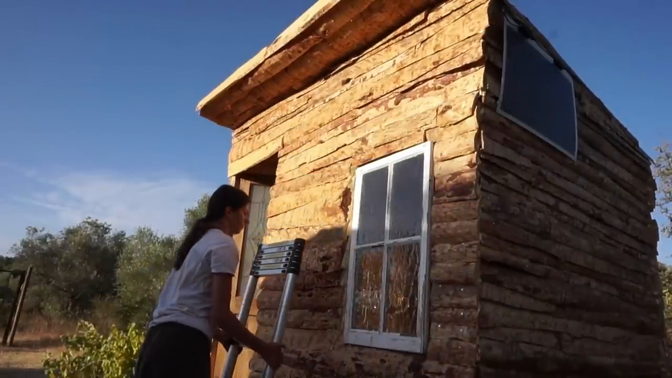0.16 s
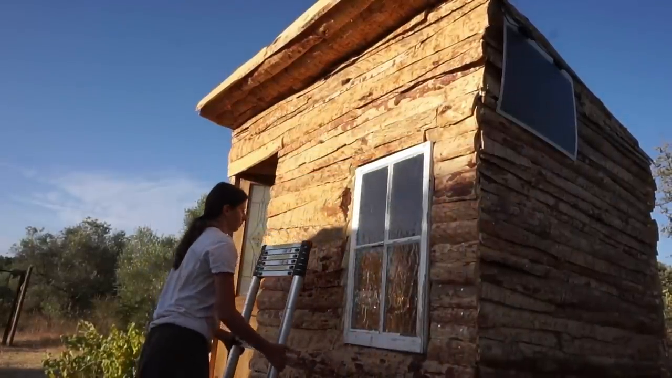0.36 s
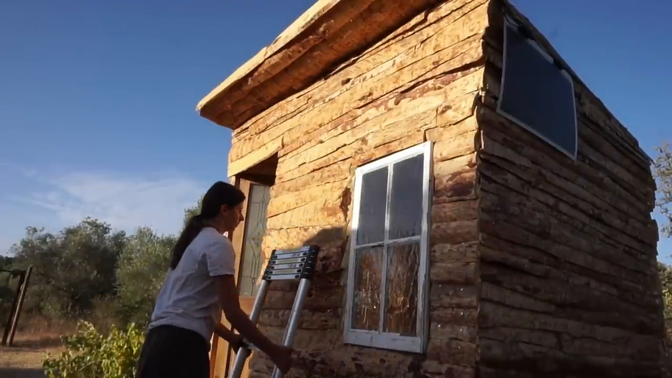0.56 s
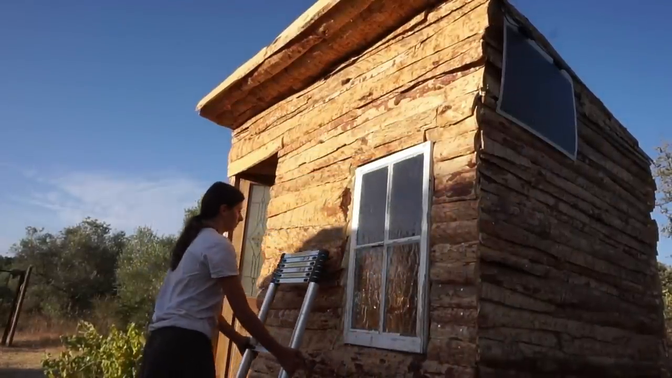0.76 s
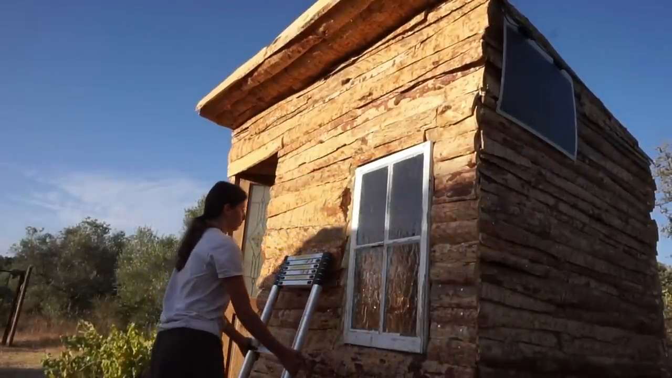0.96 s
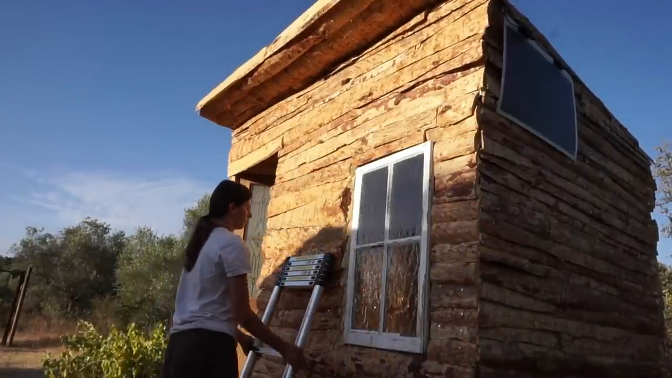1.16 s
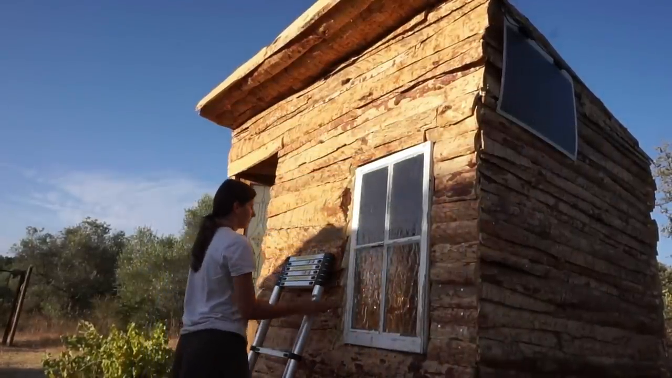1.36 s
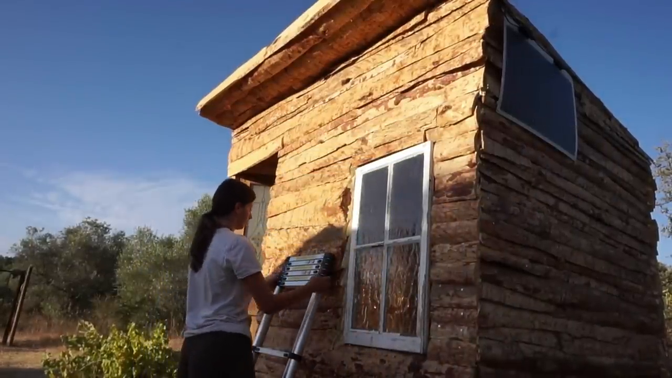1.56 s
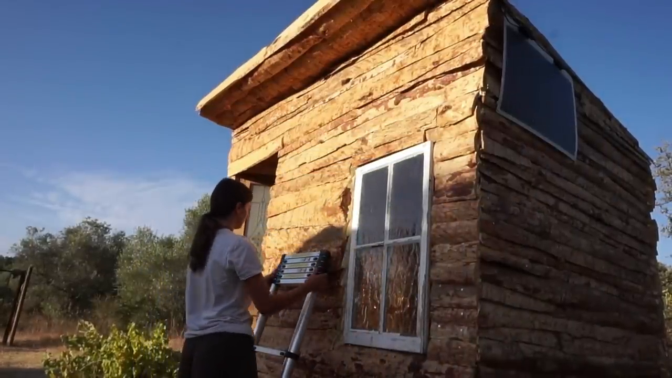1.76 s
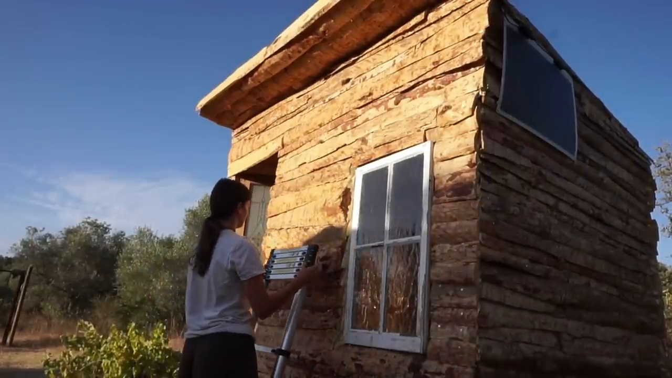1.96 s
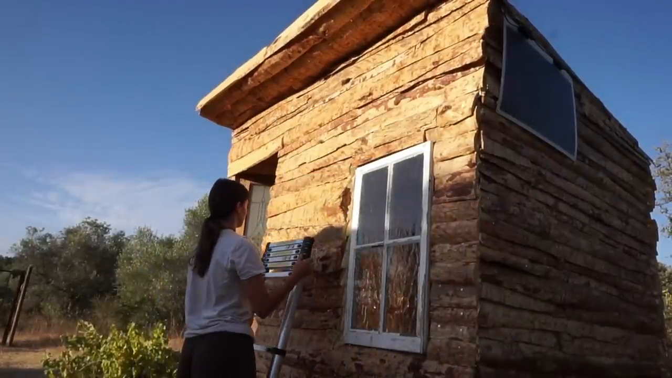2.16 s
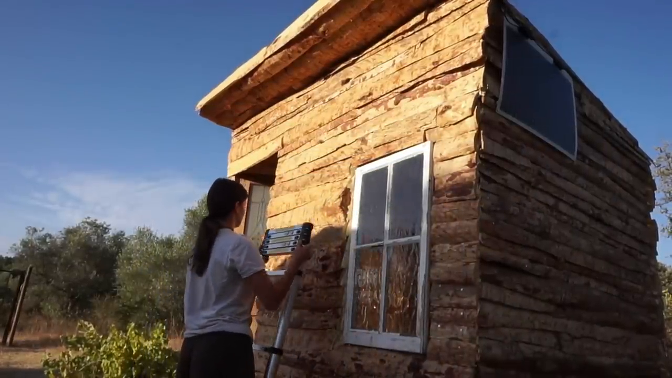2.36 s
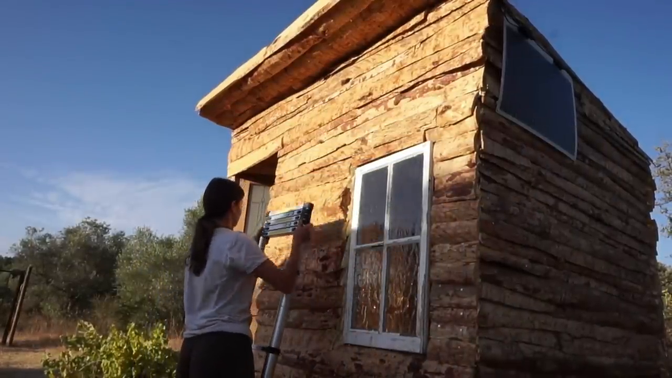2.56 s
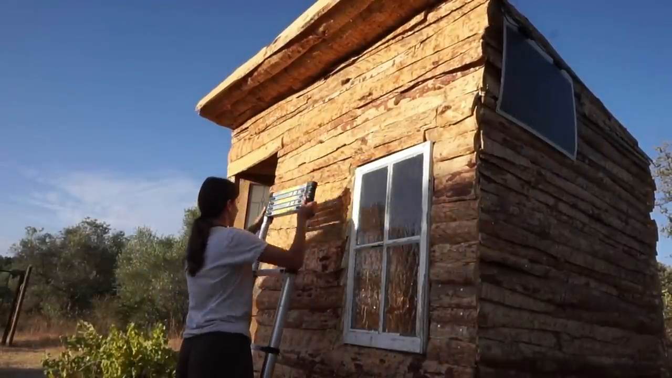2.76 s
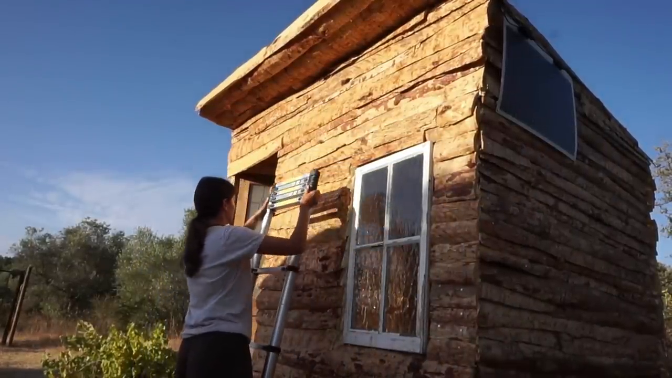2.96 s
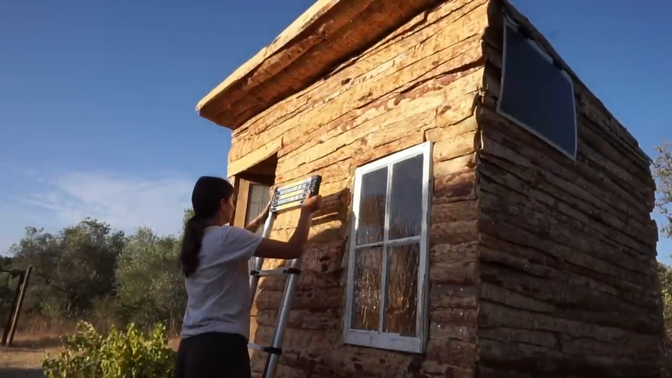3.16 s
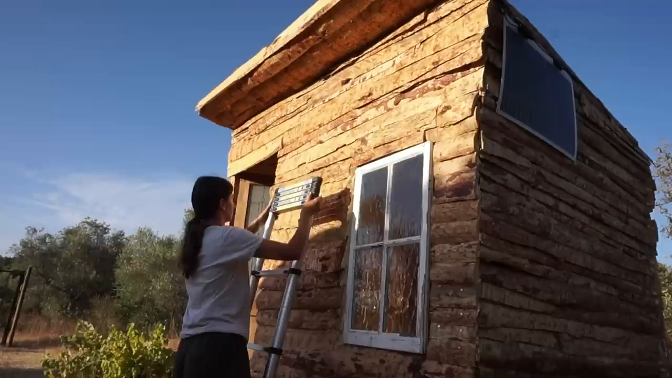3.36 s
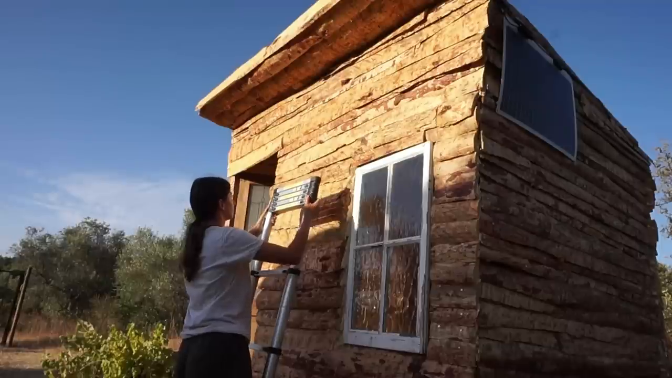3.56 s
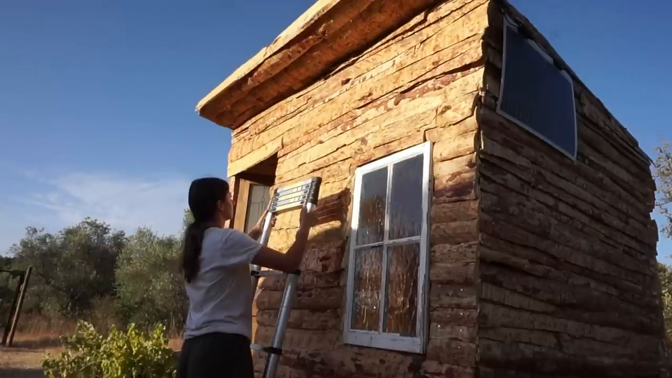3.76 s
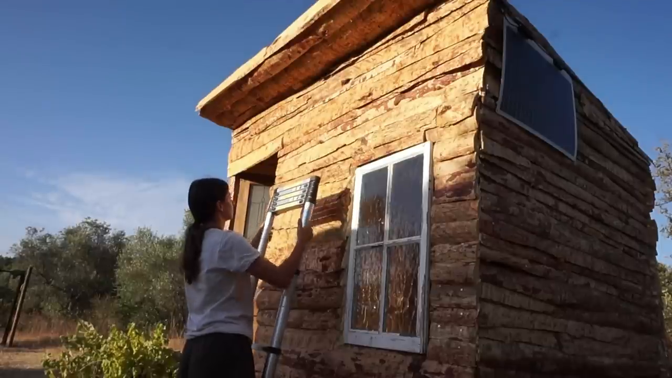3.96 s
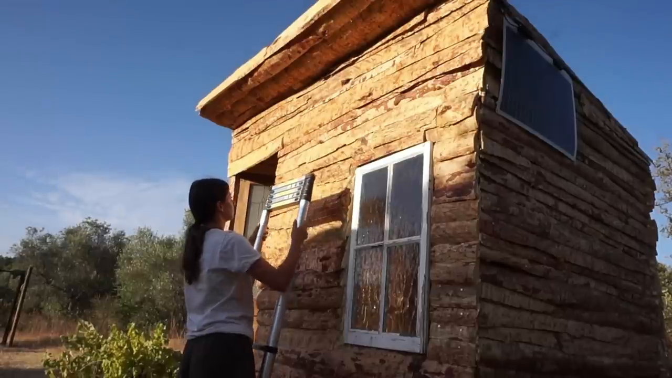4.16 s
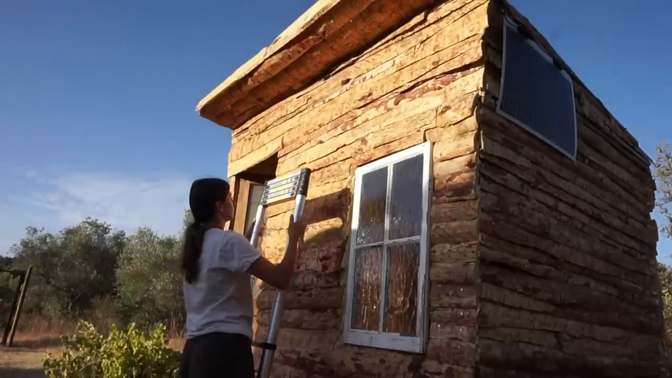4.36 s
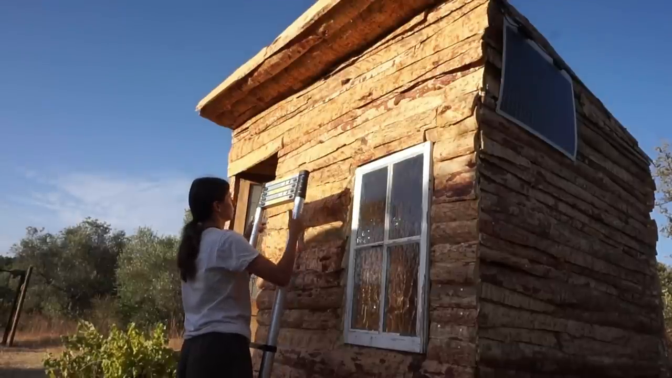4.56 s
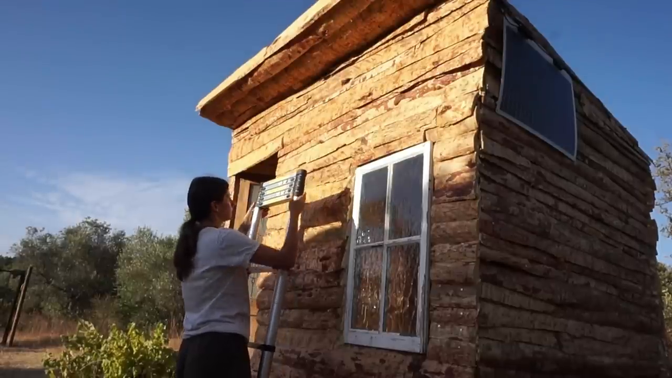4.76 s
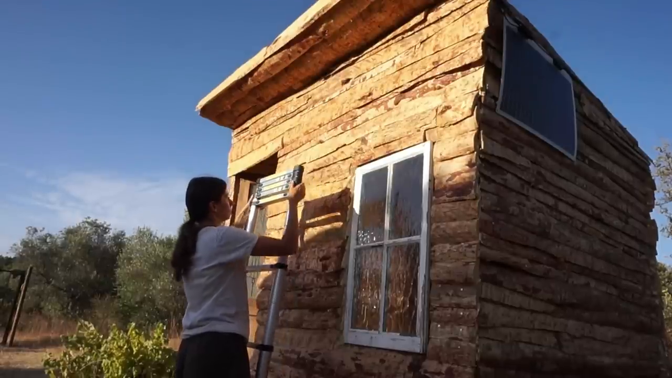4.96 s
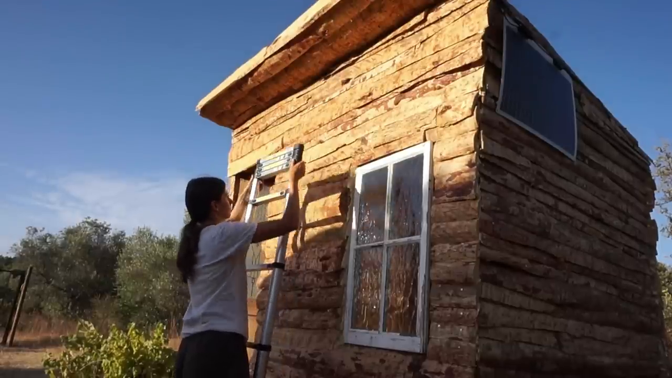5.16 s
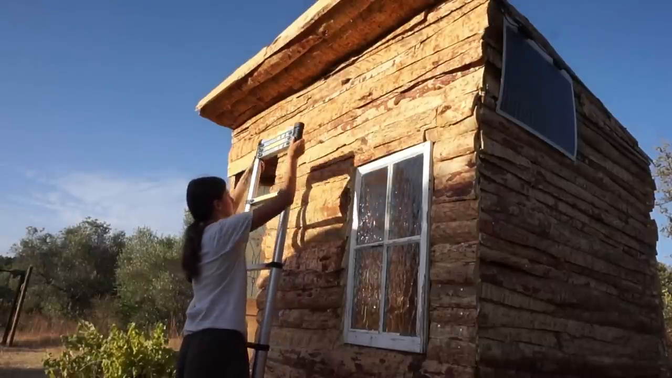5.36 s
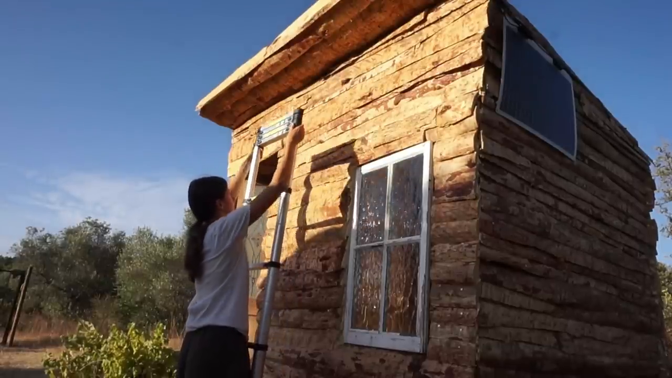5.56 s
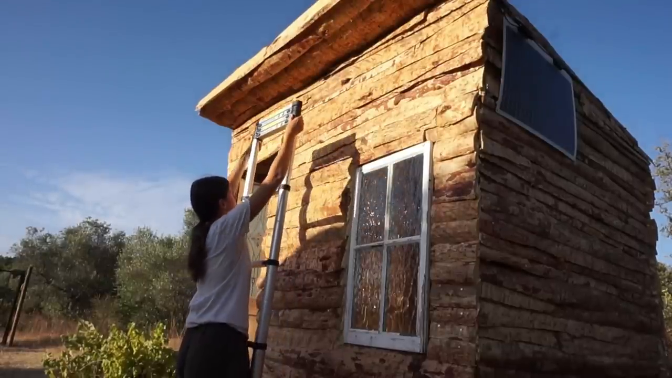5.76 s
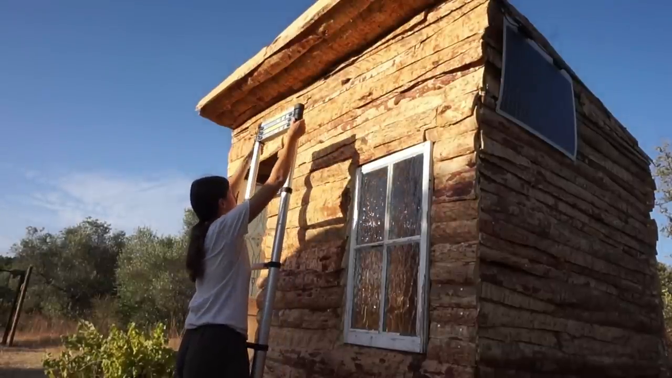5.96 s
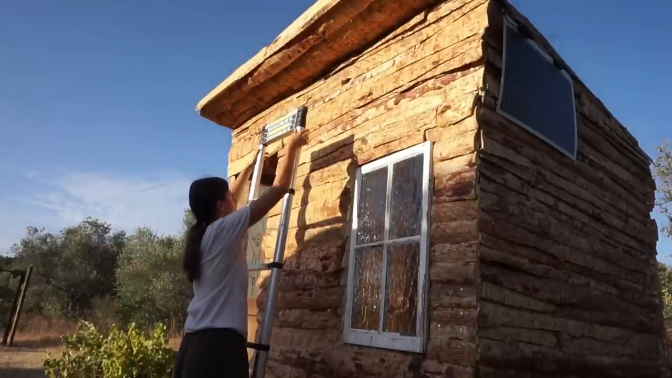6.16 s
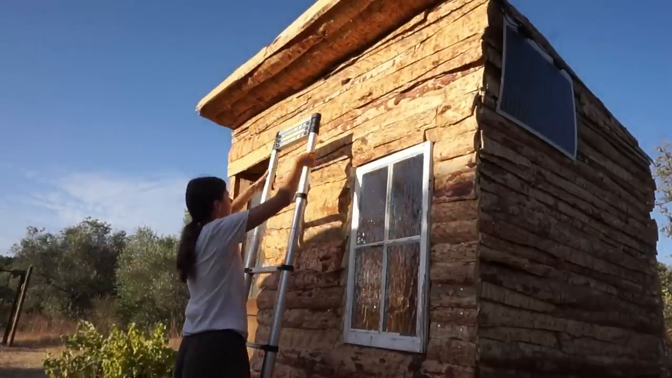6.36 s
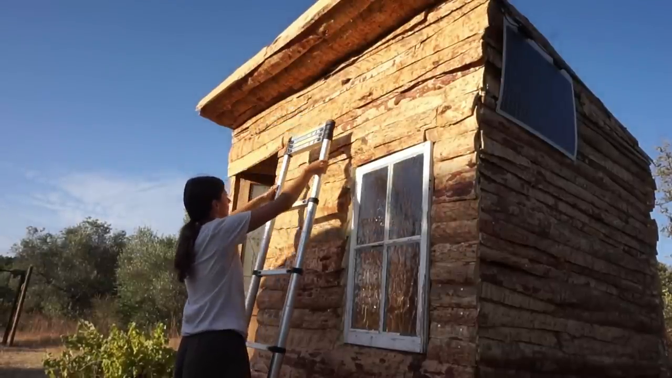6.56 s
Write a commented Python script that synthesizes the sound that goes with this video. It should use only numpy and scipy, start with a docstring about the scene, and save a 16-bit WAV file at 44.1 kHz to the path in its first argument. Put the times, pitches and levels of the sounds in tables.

```python
"""Aluminium ladder against a cabin wall

Outdoors in quiet country, one microphone, near enough that the surroundings answer only faintly.
A telescopic ladder is leaned on the wooden wall with a thump, then pulled up section by section.
Its tubes rub, catch and lock in bursts of short clacks, each leaving a faint hollow ring.
The trees keep up a low hush, and a light wind buffets the microphone."""
import sys
import numpy as np
from scipy import signal
from scipy.fft import rfft, irfft, next_fast_len
from scipy.io import wavfile
from scipy.ndimage import uniform_filter1d, map_coordinates

SR = 44100
rng = np.random.default_rng(int(sys.argv[2]) if len(sys.argv) > 2 else 0)


def unload_wav(signal):
    """Save mono or channel-first audio to the path in sys.argv[1] as 16-bit WAV at rate SR, clipped to [-1, 1]."""
    wavfile.write(
        sys.argv[1],
        SR,
        np.round(np.clip(np.atleast_2d(signal).T, -1, 1) * 32767).astype(np.int16),
    )


N = 291060

# hush of the trees: f/Hz, relative density/dB
HUSH_SPECTRUM = [(18, -48.5), (30, -18), (70, -21), (161, -3), (233, -1), (394, -4), (437, -3), (473, -4.5),
                 (1010, -11), (2900, -20), (3140, -20), (11700, -26.5), (16000, -26)]
# its course: t/s, level/dB
HUSH_COURSE = [(0, -59), (.6, -62), (1.5, -62), (2.2, -62.5), (4, -62.5), (6.6, -61.5)]
# wind on the microphone: f/Hz, relative density/dB
WIND_SPECTRUM = [(12, -39.5), (20, -5), (65, 2), (102, 1.5), (179, -9), (247, -22.5), (350, -28),
                 (460, -65), (770, -120)]
# the breeze, freshening halfway through: t/s, relative level/dB
BREEZE_COURSE = [(0, -65.5), (.9, -74), (2.8, -73), (3.6, -60), (5.0, -59.5), (5.9, -59), (6.6, -70)]
# puffs on top of it: middle t/s, half length/s, relative level/dB
WIND_PUFFS = [(.31, 0.024, -53.5), (1.16, 0.045, -58), (1.32, 0.047, -57.5), (3.47, .06, -48),
              (3.6, 0.028, -51.5), (4.1, 0.056, -43), (4.36, 0.045, -43), (4.48, 0.031, -45.5),
              (4.79, 0.03, -40.5), (5.23, 0.088, -43.5), (5.5, 0.014, -43), (5.61, 0.064, -37),
              (5.92, .03, -39.5), (6.3, .03, -53)]
# tubes, collars and pins striking:
# t/s, level/dB, low knock/dB, bright edge/dB, loss per rebound/dB, struck part's f/Hz
STRIKES = [(0.304, -53, -6, -3, 4, 2430), (0.361, -46.5, -14, -12, 15, 2440),
           (0.657, -55, -4, 8.5, 10, 4440), (0.674, -43, -0.5, -0.5, 6, 1256),
           (0.969, -53, -22, -1, 12, 1550), (1.001, -53.5, -18, -2, 12, 3400),
           (1.113, -54, -8, 6.5, 12, 14000), (1.125, -41, 22, 0, 8.5, 645), (1.16, -43.5, 5, 9.5, 7, 3900),
           (1.8, -62, -6, 10, 15, 6200), (2.586, -39, -7, -6, 10.5, 2440),
           (2.598, -36.5, 11, -2.5, 8, 1326), (2.633, -39.5, 6, -4.5, 6.5, 670),
           (2.65, -13.5, -1, -22, 20, 1770), (2.654, -19, 2, 0.5, 18, 658),
           (2.795, -50, -20, -13.5, 20, 1340), (2.824, -48, -20, -16, 20, 1370),
           (2.935, -34.5, 0.5, -6, 1, 1340), (2.951, -18.5, -13.5, 5, 5, 3260),
           (2.955, -17.5, -1.5, -1, 11, 1813), (2.992, -28, 0, -2, 9, 2420), (3.12, -40, 1, -9, 8, 2760),
           (3.15, -41, 0, 6, 8, 6240), (3.161, -31.5, 0.5, -12.5, 13, 1490), (3.179, -37.5, 0, 2, 20, 7000),
           (3.191, -36.5, 0, 6, 8, 3220), (3.204, -31, -2, -6, 12, 1286), (3.241, -48.5, 10.5, 3, 12, 710),
           (3.368, -40.5, 11.5, -1.5, 18, 842), (4.284, -41, 8.5, 3.5, 19, 1753),
           (4.309, -38.5, 7.5, 6, 9, 6930), (4.335, -34.5, 0, 7.5, 20, 3220),
           (4.345, -31.5, 3, -11, 14, 2450), (4.564, -41, 15, -4.5, 3, 660),
           (4.58, -32.5, 5, -1.5, 0.5, 887), (4.609, -27.5, 2, 0, 11, 2455),
           (4.625, -34, 11.5, 5.5, 12, 8730), (4.714, -50, 9, -12, 20, 1036),
           (4.992, -50, 5.5, -6, 18, 1630), (5.04, -52, 5, -3, 10.5, 2370),
           (5.173, -39.5, 9.5, 1.5, 5.5, 8660), (5.225, -52.5, 10, 9, 11, 6530),
           (5.299, -39.5, -1, 0, 6, 3420), (5.311, -27, 2.5, -4, 9, 1286), (5.339, -33.5, 5, -6, 12, 1845),
           (5.351, -15, -6, -7, 21, 691), (5.387, -40, 0.5, -3, 1, 4370), (5.743, -43, 5, -6, -4, 954),
           (5.767, -22, -19, 5.5, 20, 2820), (5.771, -24, 0.5, 7.5, 14, 4300),
           (5.781, -22.5, -13, 1, 19, 1770), (5.795, -25, -2.5, 0.5, 9.5, 3100),
           (5.825, -29.5, 3, -4, 9, 6000), (5.919, -34.5, 2, 1, 12, 6160), (5.928, -29, 4, -4, 14, 1490),
           (5.943, -30.5, 6, 6, 0, 2440), (5.981, -20, 0.5, 1, 17, 1620)]
# mean colour of a clack: f/Hz, relative density/dB
CLACK_SPECTRUM = [(100, -50.5), (170, -9.5), (563, -2.5), (631, -1.5), (1080, -2.5), (1760, -2), (2010, -6),
                  (2480, -3), (3000, -7.5), (4480, -9.5), (4920, -11.5), (10300, -17), (14000, -26.5),
                  (16000, -32)]
# damped resonances of the frame: f/Hz, width/Hz, boost/dB
FRAME_RESONANCES = [(654, 20, 2.5), (708.5, 21, 7.5), (820, 38, 5.5), (962, 43, 3.5), (1108, 11.7, 9.5),
                    (1300, 45, 5), (1467, 18, -2), (1764, 52, 5.5), (1866, 40, 3.5), (2310, 31, -2.5),
                    (2410, 25.4, -7), (2548, 46, 7), (2690, 34, 9), (2873, 24, 10), (3133, 80, -1),
                    (3205, 57, 7.5), (3540, 95, 2.5), (4460, 85, 8), (6500, 240, 4)]
# lingering modes of the tubes: f/Hz, relative level/dB, t60/s
TUBE_MODES = [(720, -25, .12), (1340, -31, .2), (1660, -30, .16), (1790, -23, .1), (2340, -28, .17),
              (2450, -28, .22), (2740, -28, .11), (3220, -28, .11)]
# the struck section, changing with its free length and the grip: t/s, lowest f/Hz, t60/s
STRUCK_SECTION = [(0, 200, 0.056), (2.58, 350, 0.096), (2.7, 350, 0.038), (2.93, 213, 0.072),
                  (4.6, 231, 0.076), (5.35, 258, 0.054), (5.8, 238, 0.08), (6, 215, 0.064)]
# a pin snaps home and rebounds as the ladder settles on the wall: t/s, f/Hz, level/dB, t60/s
PIN_SNAPS = [(1.1654, 4800, -17.5, 0.004), (1.169, 5580, -33.5, 0.0076)]
# scrapes as the ladder is shifted into place: middle t/s, half length/s, level/dB
SHIFT_SCRAPES = [(.35, 0.047, -62), (.68, 0.032, -57.5), (1.1, 0.055, -62.5)]
# friction of two tubes sliding out, one list a stroke: t/s, level/dB
SLIDE_STROKES = [
    [(2.3, -89), (2.5, -63.5), (2.62, -63), (2.8, -66), (2.92, -61.5), (3.1, -83)],
    [(4.5, -75), (4.75, -74.5), (5.1, -69), (5.3, -56.5), (5.55, -63), (5.7, -68.5), (5.9, -101)],
]
# hollow tube resonances, a list for the scrapes, then one a stroke: f/Hz, width/Hz, relative level/dB
BORE_RESONANCES = [
    [(1100, 500, -2), (2450, 900, 0), (4300, 1200, -6)],
    [(720, 80, -8), (1330, 80, 3), (1680, 120, -8), (2450, 130, -1), (2850, 200, -13), (6770, 500, -22)],
    [(720, 100, -4), (1150, 200, -7), (1640, 110, 2), (2400, 200, -8), (3400, 400, -14), (8600, 900, -23)],
]
# the ladder's top meets the wall: t/s, level/dB
WALL_BUMPS = [(1.1232, -29), (1.145, -37), (1.162, -34.5)]
# modes of the planks: f/Hz, relative level/dB, t60/s
PLANK_MODES = [(190, -22, 0.62), (210, -16.5, 0.29), (257, -5, 0.26), (343.6, -0.5, 0.12),
               (389, -5.5, 0.15), (500, -6, 0.036), (637, -10, 0.058), (778, -11, .05), (1065, -11, 0.046),
               (1465, -12, 0.046)]
# decay of the outdoor echo: f/Hz, t60/s
ECHO_DECAY = [(200, 1.3), (1500, 0.96), (5000, 1), (14000, 2.5)]
# its colour: f/Hz, gain/dB
ECHO_GAIN = [(200, 7), (1500, -7), (5000, -0.5), (12000, -1)]


def amp(db):
    return 10 ** (np.asarray(db) / 20)


def unit_rms(x):
    return x / np.sqrt(np.mean(x ** 2) + 1e-20)


def along(points, hz):
    """Read (f/Hz, value) points on a log frequency axis."""
    f, values = np.transpose(points)
    return np.interp(np.log(hz + 1), np.log(f + 1), values)


def curve(rows):
    """One value per sample from (t/s, value) rows."""
    return np.interp(np.arange(N) / SR, *np.transpose(rows))


def swells(rows):
    """A gain that rises and falls once for each (middle t/s, half length/s, level/dB) row."""
    t = np.arange(N) / SR
    return sum(amp(db) * np.exp(-((t - s) / half) ** 2) for s, half, db in rows)


def fade(t, t60):
    """Exponential decay, 60 dB down after t60."""
    return np.exp(-np.log(1000) * t / t60)


def wobble(rate):
    """A smooth random curve, rate knots a second."""
    return map_coordinates(rng.standard_normal(int(N * rate / SR) + 4), [np.arange(N) * rate / SR])


def filtered(x, response):
    """Shape x by a function of frequency."""
    size = next_fast_len(len(x) + 8192)
    return irfft(rfft(x, size) * response(np.fft.rfftfreq(size, 1 / SR)), size)[:len(x)]


def noise(spectrum):
    """Coloured noise of rms 1."""
    return unit_rms(filtered(rng.standard_normal(N), lambda hz: amp(along(spectrum, hz))))


def add(track, s, sound):
    """Mix a sound into the track at s seconds."""
    part = track[max(round(s * SR), 0):][:len(sound)]
    part += sound[:len(part)]


def ring(modes, t, scatter_db):
    """Damped modes, each struck at a random strength and sign."""
    hz, db, t60 = np.transpose(modes)[:, :, None]
    gain = amp(db + scatter_db * rng.standard_normal(hz.shape)) * rng.choice([-1, 1], hz.shape)
    return np.sum(gain * np.sin(2 * np.pi * hz * t) * fade(t, t60), axis=0)


def tree_hush(drift_db=1.3):
    """The trees around the cabin give a nearly steady hush."""
    return amp(curve(HUSH_COURSE) + drift_db * wobble(rate=6.7)) * noise(HUSH_SPECTRUM)


def wind_on_microphone(gain_db=-1, flutter_db=2.5):
    """Eddies of a fluttering breeze and its puffs rumble right on the microphone."""
    eddies = noise(WIND_SPECTRUM)
    power = np.abs(uniform_filter1d(eddies ** 2, size=4000))
    eddies /= np.sqrt(power + 1e-6)  # the gusts alone set their strength
    breeze = amp(curve(BREEZE_COURSE) + flutter_db * wobble(rate=14))
    return amp(gain_db) * np.hypot(breeze, swells(WIND_PUFFS)) * eddies


def rebounds(count=2, flight_s=.0125, scatter=.12):
    """Loose parts strike and fall back, mostly weaker: yields t/s, level/dB, knock/dB, edge/dB."""
    for s, db, knock_db, edge_db, loss_db, _ in STRIKES:
        flights = flight_s * np.exp(scatter * rng.standard_normal(count))
        for k, delay in enumerate(np.cumsum([0, *flights])):
            if k * loss_db < 20:
                yield s + delay, db - k * loss_db, knock_db, edge_db


def ladder_clacks(hold_s=0.0017, edge_t60=0.063, shiver_db=-23, shiver_t60=0.29, tubes_db=2):
    """Each blow shakes a crowd of frame modes that plastic collars soon damp; a few tube modes ring on."""
    t = np.arange(16384) / SR
    hz = np.fft.rfftfreq(len(t), 1 / SR)

    def crowd(gain):
        """Dense modes in random phase."""
        return irfft(gain * np.exp(2j * np.pi * rng.random(len(hz))))

    def ripple(size):
        """Noise smoothed over size points."""
        return unit_rms(signal.fftconvolve(rng.standard_normal(len(t)), np.hanning(size), "same"))

    frame = amp(sum(db / (1 + (2 * (hz - f) / width) ** 2) for f, width, db in FRAME_RESONANCES))
    body = frame * amp(along(CLACK_SPECTRUM, hz))
    body /= np.std(irfft(body))
    treble = 1 / (1 + (4000 / (hz + 1)) ** 4)
    upper_modes = ripple(size=70)  # the frame's fine upper resonances, alike for all blows
    free_s = np.maximum(t - hold_s, 0)  # the parts stay in touch for a moment, then ring freely
    when, lowest_hz, section_t60 = np.transpose(STRUCK_SECTION)
    track = np.zeros(N)
    for s, db, knock_db, edge_db in rebounds():
        tilt = [(550, knock_db), (1200, 0), (2600, 0.0082), (6500, edge_db), (14000, 1.54 * edge_db)]
        colour = body * amp(along(tilt, hz))
        # each point of contact favours its own share of the upper modes
        favour = amp(3 * upper_modes + 2.2 * ripple(size=330) - 1.5)[:len(hz)]
        clack = crowd(colour * np.sqrt(1 - treble)) * fade(free_s, np.interp(s, when, section_t60))
        edge = crowd(colour * favour * np.sqrt(treble)) * fade(free_s, edge_t60)
        chatter = unit_rms(amp(ripple(size=100)))  # loose parts chatter by about 1 dB
        shiver = crowd(colour / frame * amp(shiver_db - 3 * treble)) * fade(t, shiver_t60)
        tubes = amp(tubes_db) * ring(TUBE_MODES, t, scatter_db=3)
        rise_s = 0.0014 * amp(-0.27 * (db + 17))  # light contacts graze and build up more slowly
        blow = amp(db) * (1 - np.exp(-t / rise_s)) * (chatter * (clack + edge) + shiver + tubes)
        # thin tubes radiate almost nothing below their lowest note
        low_cut = signal.butter(6, np.interp(s, when, lowest_hz), "highpass", fs=SR, output="sos")
        add(track, s, signal.sosfilt(low_cut, blow))
    return track


def pin_pings(ping_db=-6, ping_t60=.05, attack_s=0.00069, spread=.016, linger_db=-17, linger_ratio=2.7):
    """The struck pin or collar rings in a tight cluster of modes; a faint part lingers."""
    t = np.arange(SR // 4) / SR
    track = np.zeros(N)
    notes = [(s, hz, db + ping_db, ping_t60) for s, db, *_, hz in STRIKES]
    for s, hz, db, t60 in PIN_SNAPS + notes:
        detune, phase = rng.standard_normal((2, 8, 1))
        cluster = np.sin(2 * np.pi * (hz * (1 + spread * detune) * t + phase)).sum(axis=0)
        decay = fade(t, t60) + amp(linger_db) * fade(t, linger_ratio * t60)
        envelope = decay * (1 - np.exp(-t / attack_s))
        add(track, s, amp(db) * unit_rms(cluster * envelope) * np.sqrt(np.mean(envelope ** 2)))
    return track


def sliding_tubes(roughness_db=3):
    """Uneven friction sounds each hollow tube as it is shifted or drawn out."""
    t = np.arange(N) / SR
    track = np.zeros(N)
    strokes = [amp(curve(rows)) * (t > rows[0][0]) * (t < rows[-1][0]) for rows in SLIDE_STROKES]
    for friction, modes in zip([swells(SHIFT_SCRAPES)] + strokes, BORE_RESONANCES):
        def bore(hz):
            """The tube's resonances, alternating in sign."""
            return sum((-1) ** k * amp(db) * 1j * hz * width / (f * f - hz * hz + 1j * hz * width)
                       for k, (f, width, db) in enumerate(modes))

        rub = rng.standard_normal(N) * amp(roughness_db * wobble(rate=160))
        track += friction * unit_rms(filtered(rub, bore))
    return track


def wall_thumps(attack_s=0.001):
    """The rubber-capped top thumps the cabin's planks and rebounds."""
    t = np.arange(SR // 2) / SR
    track = np.zeros(N)
    for s, db in WALL_BUMPS:
        add(track, s, amp(db) * (1 - np.exp(-t / attack_s)) * ring(PLANK_MODES, t, scatter_db=1))
    return track


def outdoor_echo(x, build_s=.03):
    """Trees and ground scatter the sound back to the microphone as a long, thin, diffuse tail."""
    hz, t, spectrum = signal.stft(x, SR, nperseg=256)
    power = uniform_filter1d(np.abs(spectrum) ** 2, size=9, axis=0)  # scattering blurs the ringing
    decay = (fade(t, along(ECHO_DECAY, hz)[:, None]) * (1 - np.exp(-t / build_s))) ** 2
    decay /= decay.sum(axis=1, keepdims=True)
    lingering = np.abs(signal.fftconvolve(power, decay, axes=1))[:, :len(t)]
    diffuse = signal.stft(rng.standard_normal(N), SR, nperseg=256)[2]
    tail = diffuse / np.std(diffuse) * np.sqrt(lingering) * amp(along(ECHO_GAIN, hz))[:, None]
    return signal.istft(tail, SR, nperseg=256)[1][:N]


def scene(echo_db=-26):
    """At the microphone: ladder and wall up front, faint echo and trees behind, wind on top."""
    ladder = ladder_clacks() + pin_pings() + sliding_tubes() + wall_thumps()
    return (ladder + amp(echo_db) * outdoor_echo(ladder) + tree_hush() + wind_on_microphone())[None]


def record(dry, top_hz=15850):
    """One mono channel, cut off steeply at the recorder's band limit."""
    return filtered(dry[0], lambda hz: 1 / (1 + (hz / top_hz) ** 160))[None]


dry = scene()
out = record(dry)
unload_wav(out)
```